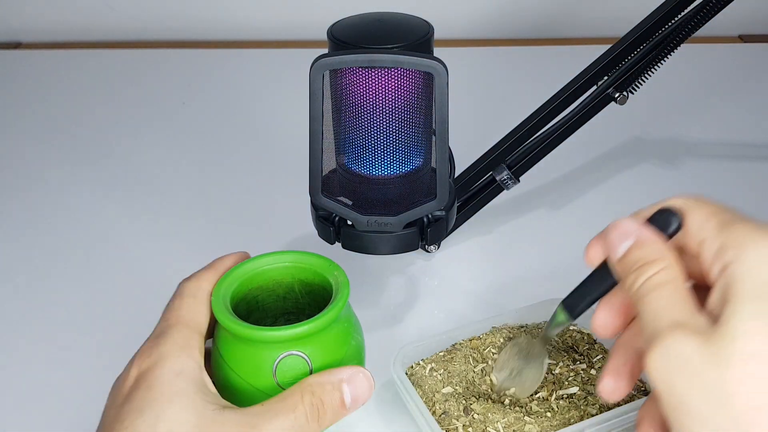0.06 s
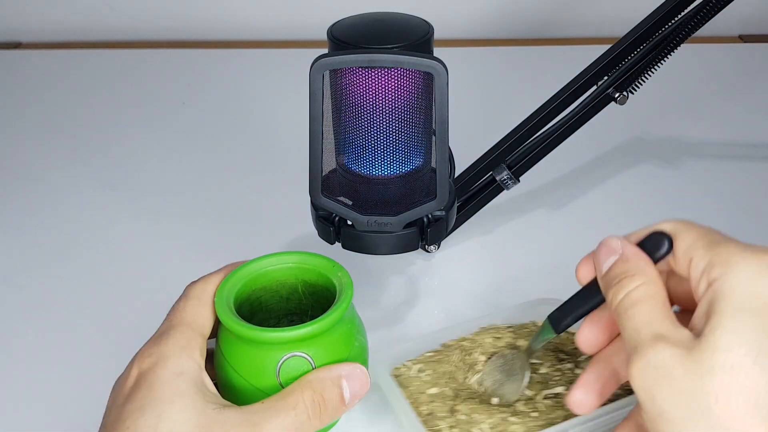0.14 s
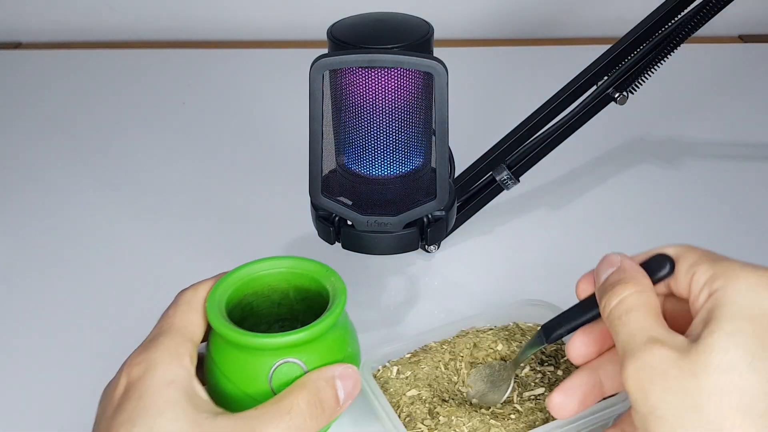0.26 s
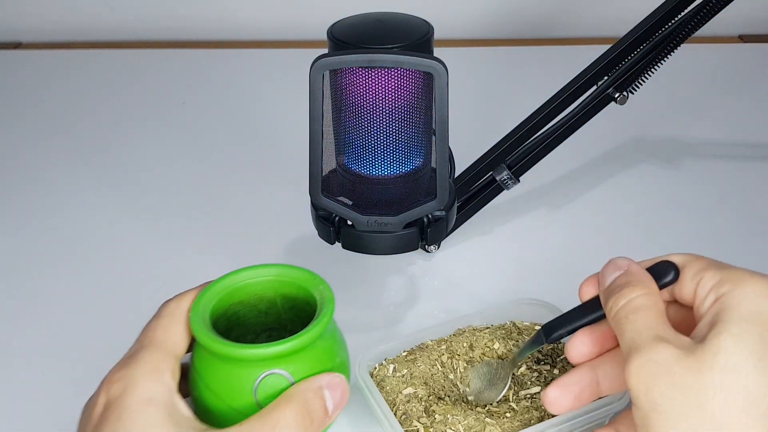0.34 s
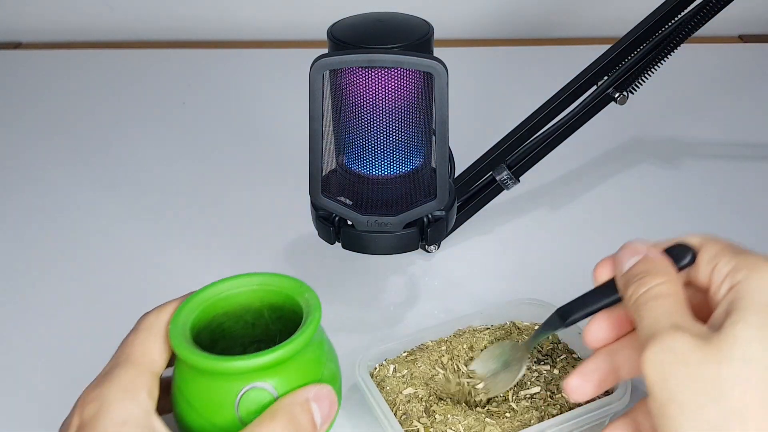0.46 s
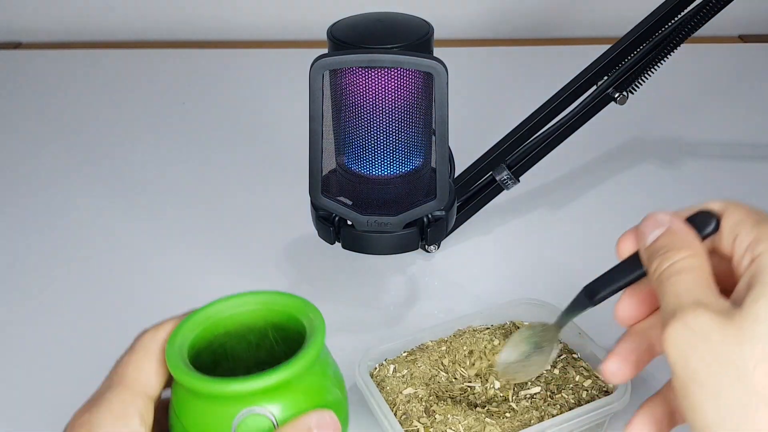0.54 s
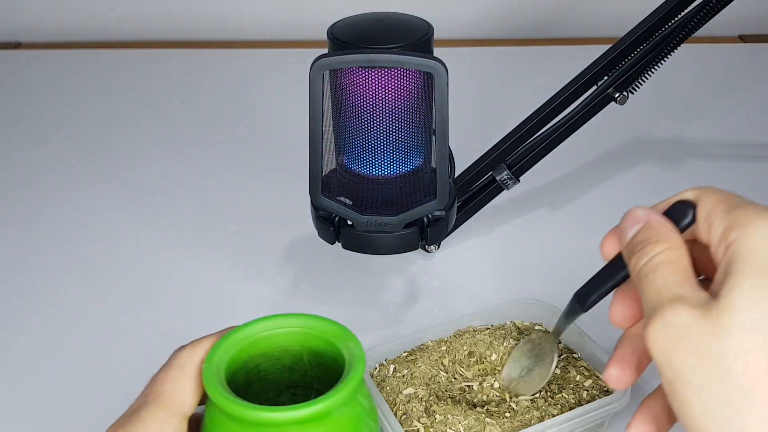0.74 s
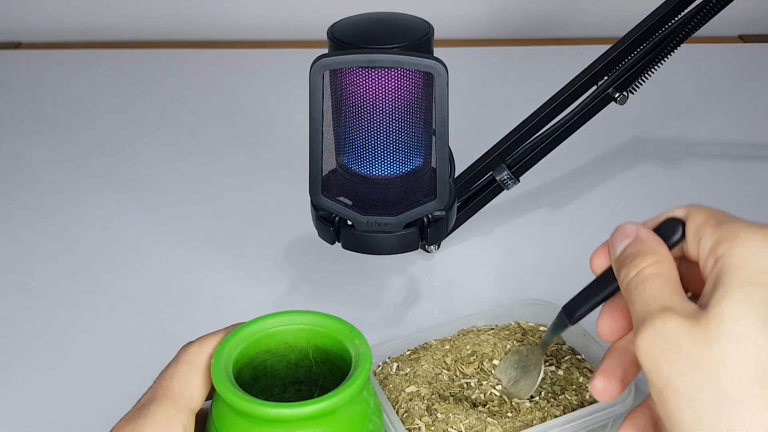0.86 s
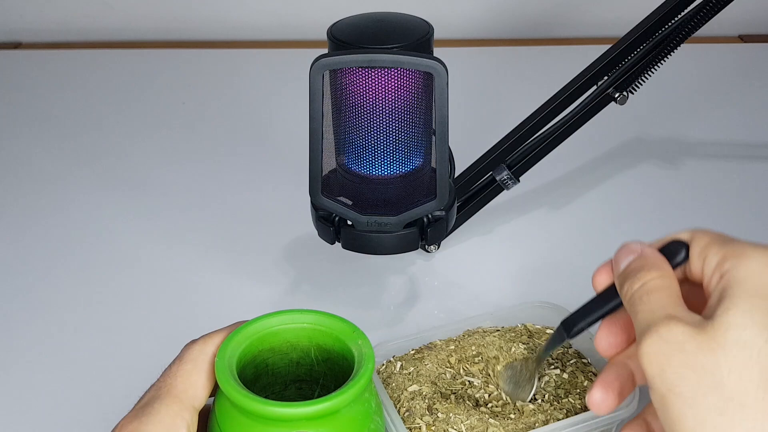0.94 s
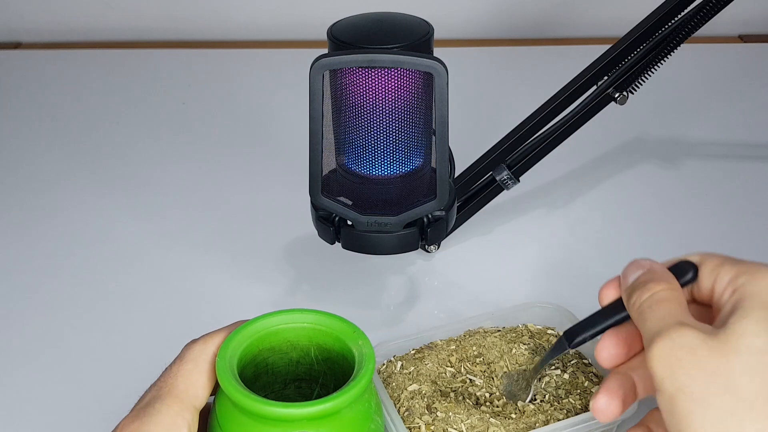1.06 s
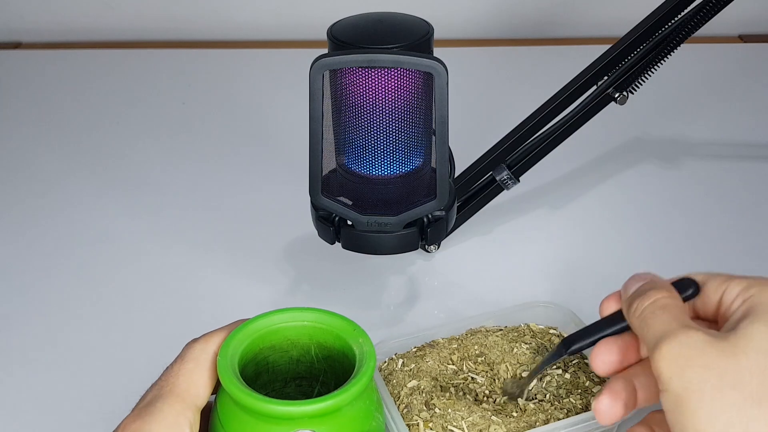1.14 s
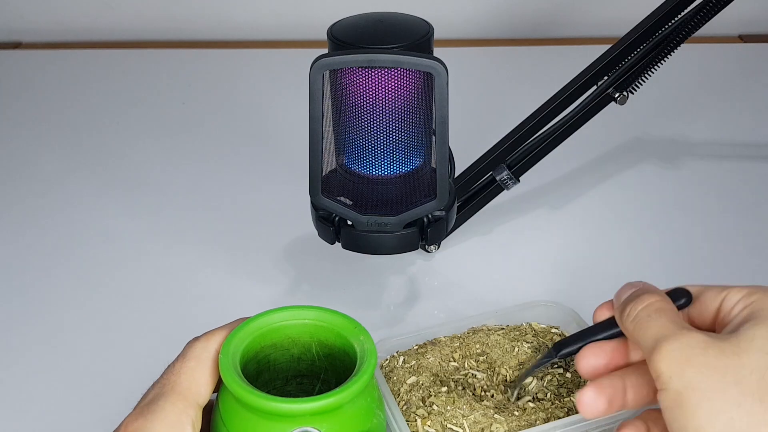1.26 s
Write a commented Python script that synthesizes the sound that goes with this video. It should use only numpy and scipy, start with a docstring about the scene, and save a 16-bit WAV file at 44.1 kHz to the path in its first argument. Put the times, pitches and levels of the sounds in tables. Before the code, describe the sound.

Dried herb rustles and crunches close to the microphone as a spoon goes in and knocks against the plastic container. After a short pause, the crisp scraping resumes with lighter touches, over a small room's faint low rumble.

```python
"""A spoon ploughs through dried herb in a plastic tub, heard from close by.
It dips in and knocks once on the bottom, exciting the tub's damped modes; later touches are lighter.
After a pause it digs on: flakes crackle in tiny impacts, stalks snap by brittle fracture, and the
stick-slip scraping grows brighter with depth. A small room with a low steady rumble reverberates."""
import sys
import numpy as np
from scipy import signal
from scipy.fft import rfft, irfft, next_fast_len
from scipy.io import wavfile
from scipy.ndimage import map_coordinates

SR = 44100
rng = np.random.default_rng(int(sys.argv[2]) if len(sys.argv) > 2 else 0)


def unload_audio(sound):
    """Save the sound as a 16-bit wav file, at the path given as the first command line argument."""
    columns = np.transpose(np.atleast_2d(sound))
    # keep every value between -1 and 1, then stretch to whole-number steps
    steps = np.round(np.clip(columns, -1, 1) * 32767)
    wavfile.write(sys.argv[1], SR, steps.astype(np.int16))


N = 57330


def amp(db):
    """Amplitude ratio of a level in decibels."""
    return 10 ** (np.asarray(db) / 20)


def unit(x):
    """Normalisation to rms 1."""
    return x / np.sqrt(np.mean(x ** 2) + 1e-20)


def along(points, hz):
    """Interpolation of (f, value) points on a logarithmic frequency axis."""
    f, values = np.transpose(points)
    return np.interp(np.log(hz + 1), np.log(f + 1), values)


def curves(rows):
    """Linear interpolation in time: one curve for each column after the first."""
    times, *columns = np.transpose(rows)
    return [np.interp(np.arange(N) / SR, times, column) for column in columns]


def coloured(x, spectrum):
    """Minimum-phase filter with the given spectrum; white noise keeps its power."""
    m = 2 * next_fast_len(N)
    gain = unit(amp(along(spectrum, np.fft.rfftfreq(m, 1 / SR))))
    cepstrum = irfft(np.log(gain))[:m // 2]
    cepstrum[1:] *= 2
    return irfft(rfft(x, m) * np.exp(rfft(cepstrum, m)))[:N]


def add(track, start_s, sound):
    """Superposition of a sound on the track."""
    part = track[max(round(start_s * SR), 0):][:len(sound)]
    part += sound[:len(part)]


def grains(per_s, spread_db):
    """Shot noise: impulses of random time, size and sign, rms 1."""
    size = amp(spread_db * np.clip(rng.standard_normal(N), -2, 2))
    occurs = rng.random(N) < per_s / SR
    return unit(occurs * size * rng.choice([-1, 1], N))


# Spectrum of the room's rumble: f/Hz, relative level/dB
RUMBLE_SPECTRUM = [(15, -23), (42, 1.5), (66, 2.5), (95, -3), (200, -13), (330, -9), (480, -16.5),
                   (1000, -31), (3000, -40.5), (15000, -54)]
# Envelope of the deep hum: t/s, level/dB
HUM_ENVELOPE = [(0, -43), (.3, -40.5), (.6, -39), (.85, -51.5), (1.2, -46.5)]
# Faint low tones of the room: f/Hz, relative level/dB
DRONE_TONES = [(69, -2), (161, -8.5), (211, -4.5), (320, -7), (433, -9)]
# Their common envelope: t/s, level/dB
DRONE_ENVELOPE = [(0, -61), (.5, -49.5), (.95, -56.5), (1.26, -48.5)]
def background(rumble_db=-44.5, hum_hz=26.9, drift_hz=4.37):
    """Stationary noise rumbles; slow modulation makes a deep hum swell and fade and faint tones waver."""
    t = np.arange(N) / SR
    hum = unit(np.sin(2 * np.pi * (hum_hz * t + rng.random())))
    drone = np.zeros(N)
    for hz, db in DRONE_TONES:
        drift = drift_hz * map_coordinates(rng.standard_normal(size=16), [10 * t])  # 10 values a second
        cycles = np.cumsum(hz + drift) / SR + rng.random()
        drone += amp(db) * unit(np.sin(2 * np.pi * cycles))
    rumble = amp(rumble_db) * unit(coloured(rng.standard_normal(N), RUMBLE_SPECTRUM))
    return rumble + amp(curves(HUM_ENVELOPE)[0]) * hum + amp(curves(DRONE_ENVELOPE)[0]) * drone


# Envelope of the stirred flakes: t/s, level/dB
RUSTLE_ENVELOPE = [(0, -112), (.036, -76), (.046, -57), (.07, -52.5), (.092, -45), (.135, -52), (.165, -59),
                   (.205, -53.5), (.217, -44), (.26, -66), (.31, -64), (.53, -68), (.555, -59),
                   (.605, -57.5), (.632, -64.5), (.66, -53), (.685, -60.5), (.74, -54.5), (.81, -51.5),
                   (.96, -51), (.985, -45.5), (1.008, -56.5), (1.03, -51), (1.085, -61), (1.165, -51.5),
                   (1.3, -63)]
# Spectra of loose and of packed flakes: f/Hz, relative level/dB
LOOSE_SPECTRUM = [(200, -14), (1000, -2.5), (2400, 3), (3150, -7), (3700, 0), (5300, 0.5), (6700, 4),
                  (7400, -4.5), (9400, 0.5), (11500, 0), (13200, -3), (15500, -4.5)]
PACKED_SPECTRUM = [(200, -6), (1000, -9), (2700, -4), (3250, -5), (3700, 5), (5300, -0.5), (6500, 3.5),
                   (7700, -3.5), (9400, 3.5), (11500, -5.5), (13200, -11.5), (15500, -20)]
def rustle():
    """Impacts of dry flakes on the spoon sum to shot noise: airy on top, duller where they are packed."""
    level_db, = curves(RUSTLE_ENVELOPE)
    ticks = amp(level_db) * grains(per_s=2200, spread_db=0.5)
    return by_depth(ticks, LOOSE_SPECTRUM, PACKED_SPECTRUM)


# The spoon's scraping, and the diffuse wash dying away after the knock (0.21 to 0.62 s):
# t/s, level/dB, depth (0 to 1)
SCRAPE_AND_WASH = [(.045, -75, 0), (.078, -41.5, 0.55), (.096, -34.5, 0.58), (.135, -41.5, 0.65),
                   (.165, -52.5, 0.2), (.21, -43, 0.74), (.3, -46.5, 0.44), (.62, -73, 0.08),
                   (.66, -47, 0.3), (.72, -54, 0), (.81, -39.5, 0.13), (.835, -46, 0.64),
                   (.938, -41.5, 0.44), (.962, -45.5, 1), (.978, -33.5, 0.63), (.996, -35, 0.76),
                   (1.006, -45.5, 1), (1.033, -40.5, 1), (1.085, -52, 0.6), (1.11, -46, 1),
                   (1.17, -46, 0.89), (1.3, -57, 0.73)]
# Clumps giving way: t/s, level/dB
CRUMBLING_CLUMPS = [(0.753, -39), (0.774, -41), (0.813, -28.5), (0.84, -31.5), (0.857, -35), (0.873, -31),
                    (0.886, -30), (0.902, -36), (0.916, -35.5), (0.9345, -27.5), (.94, -39), (0.98, -28.5),
                    (0.989, -30)]
# Spectra of shallow and of deep scraping: f/Hz, relative level/dB
SHALLOW_SPECTRUM = [(40, -3.5), (150, -2), (400, 2.5), (800, -4), (1200, 1.5), (1550, 1.5), (1750, -4),
                    (2250, -7), (3100, -28), (8000, -47.5)]
DEEP_SPECTRUM = [(40, -23), (150, 1.5), (420, -3.5), (750, -0.5), (1300, -6), (2000, 1), (2400, -5.5),
                 (2850, -6), (3300, -15.5), (8000, -30)]
def scrape_and_wash(crunch_t60_s=0.015):
    """Stick-slip friction and crumbling clumps, brighter at depth; also the knock's diffuse tail."""
    level_db, _ = curves(SCRAPE_AND_WASH)
    excitation = amp(level_db) * grains(per_s=3200, spread_db=3.5)
    t = np.arange(SR // 20) / SR
    for start_s, db in CRUMBLING_CLUMPS:
        crunch = amp(db - 60 * t / crunch_t60_s) * rng.standard_normal(len(t))
        add(excitation, start_s, crunch)
    return by_depth(excitation, SHALLOW_SPECTRUM, DEEP_SPECTRUM)


def by_depth(x, shallow, deep):
    """Source-filter model: the depth curve divides the excitation between two spectra."""
    _, depth = curves(SCRAPE_AND_WASH)
    return coloured(x * (1 - depth), shallow) + coloured(x * depth, deep)


# Stalks breaking: t/s, level/dB, resonance f/Hz, T60/s
FRACTURES = [(0.088, -41, 6000, 0.012), (0.0919, -31, 2400, 0.007), (0.094, -26, 8750, 0.0062),
             (0.1006, -37.5, 2450, 0.0067), (0.112, -42, 7000, 0.024), (0.131, -33.5, 4240, 0.026),
             (0.1333, -38.5, 3040, 0.036), (0.199, -35, 5460, 0.012), (0.2107, -33, 4500, 0.032),
             (0.2149, -25, 8850, 0.0077), (0.231, -34.5, 3950, 0.021), (0.2417, -36.5, 7900, 0.039),
             (0.2557, -33.5, 6900, 0.024), (0.6972, -36.5, 5330, 0.0075), (0.8066, -29, 13100, 0.0073),
             (0.8585, -42.5, 12000, 0.0079), (.9345, -39.5, 4500, 0.041), (0.9368, -40.5, 14700, 0.02),
             (1.109, -31.5, 8000, .013), (1.158, -33.5, 11200, 0.015)]
# Their common spectrum: f/Hz, relative level/dB
FRACTURE_SPECTRUM = [(100, 18.5), (700, -5.5), (2200, 5), (3300, 0.5), (6400, -4.5), (7600, -7.5),
                     (9300, -4.5), (12500, -11), (16000, -12)]
def snaps(ring_db=-6.5):
    """Brittle fracture: each stalk gives a decaying noise burst with its own broad resonance."""
    out, t = np.zeros(N), np.arange(SR // 20) / SR
    for start_s, db, hz, t60 in FRACTURES:
        noise = rng.standard_normal(len(t))
        resonance = signal.iirpeak(hz, Q=2.4, fs=SR)
        ring = unit(signal.lfilter(*resonance, noise))
        crack = unit(noise + amp(ring_db) * ring)
        add(out, start_s, amp(db - 60 * t / t60) * crack)
    return coloured(out, FRACTURE_SPECTRUM)


# Contacts of spoon and tub: t/s, ring level/dB, cut-off f/Hz (low when cushioned), thud level/dB
TUB_CONTACTS = [ (.21069, -11.4, 1520, -22.7), (.21324, -9.3, 1740, -23.7), (.21493, -1, 6240, -35),
                (0.2419, -29, 2520, -27.5), (0.6977, -27, 1240, -32), (0.8127, -41, 2050, -24),
                (0.9959, -27.5, 2500, -55)]
# Modes of the tub: f/Hz, relative level/dB, T60/s
TUB_MODES = [(111, 1.4, .005), (522, -18.9, .032), (807, -14.9, .047), (837, 4.4, .0084),
             (1209, 3.2, .0039), (1440, -15.3, .033), (1850, -25, .018), (2504, -18, .01),
             (6510, -16, .0042)]
def knocks(thud_hz=169, thud_t60_s=0.0059):
    """Impact shoves the tub with a thud and excites its damped modes; a cushion of herb dulls the ring."""
    out, t = np.zeros(N), np.arange(SR // 10) / SR
    ring = sum((-1) ** k * amp(db - 60 * t / t60) * np.sin(2 * np.pi * hz * t)
               for k, (hz, db, t60) in enumerate(TUB_MODES))
    thud = -amp(-60 * t / thud_t60_s) * np.sin(2 * np.pi * thud_hz * t)
    thud /= abs(thud).max()
    for start_s, ring_db, cutoff_hz, thud_db in TUB_CONTACTS:
        cushion = signal.butter(2, cutoff_hz, fs=SR)
        add(out, start_s, amp(ring_db) * signal.lfilter(*cushion, ring) + amp(thud_db) * thud)
    return out


# Reverberation time of the room: f/Hz, T60/s
REVERB_TIMES = [(100, 0.13), (500, 0.65), (1300, 0.6), (4000, 0.29), (12000, 0.35)]
# Colour of the reverberation: f/Hz, relative level/dB
REVERB_SPECTRUM = [(60, -1), (400, 4.5), (850, 0.5), (1400, 3.5), (2050, 6.5), (4000, 6.5), (14000, 6)]
def reverberation(x, delay_s=0.008):
    """The room's diffuse field decays exponentially, each frequency at its own rate."""
    hz, t, noise = signal.stft(rng.standard_normal(SR // 2), SR, nperseg=256)
    decay = amp(-60 * t / along(REVERB_TIMES, hz)[:, None])
    _, tail = signal.istft(noise * decay, SR, nperseg=256)
    response = np.pad(tail / np.linalg.norm(tail), (round(delay_s * SR), 0))
    return coloured(signal.fftconvolve(x, response)[:N], REVERB_SPECTRUM)


def scene(reverb_db=-10):
    """Superposition of direct sound, reverberation and background, in one channel."""
    direct = rustle() + scrape_and_wash() + snaps() + knocks()
    return (direct + amp(reverb_db) * reverberation(direct) + background())[None]


def record(dry, cutoff_hz=15850):
    """An ideal low-pass filter removes the highest treble."""
    m = 2 * next_fast_len(N)
    passband = np.fft.rfftfreq(m, 1 / SR) < cutoff_hz
    return irfft(rfft(dry, m) * passband, m)[:, :N]


dry = scene()
out = record(dry)
unload_audio(out)
```